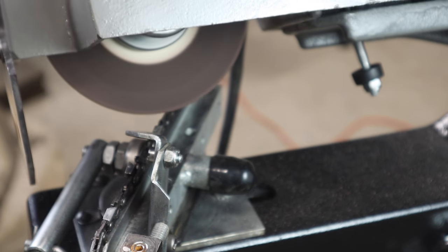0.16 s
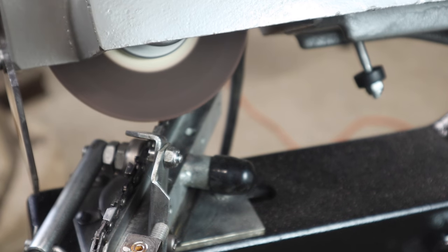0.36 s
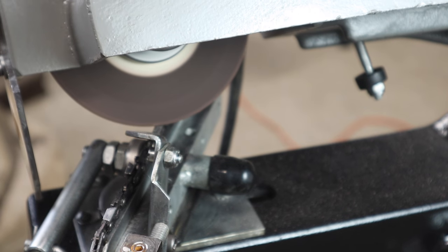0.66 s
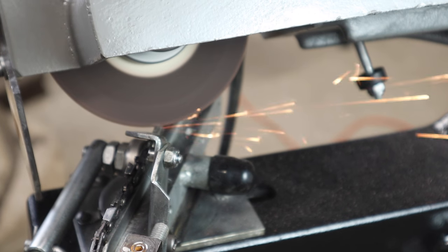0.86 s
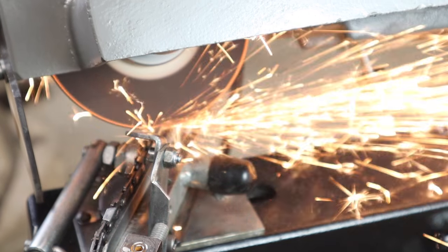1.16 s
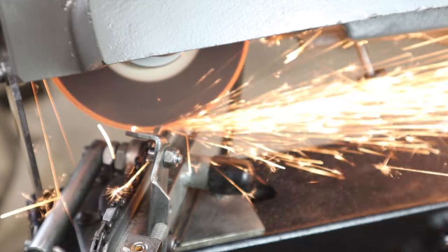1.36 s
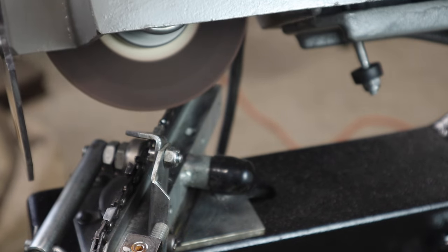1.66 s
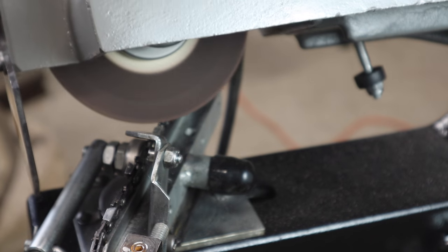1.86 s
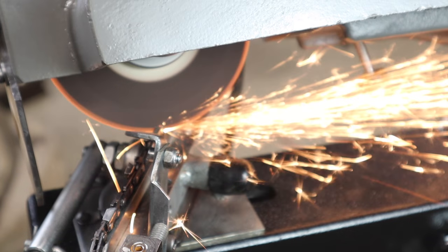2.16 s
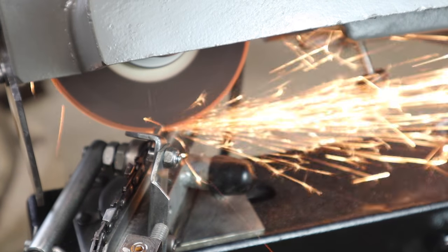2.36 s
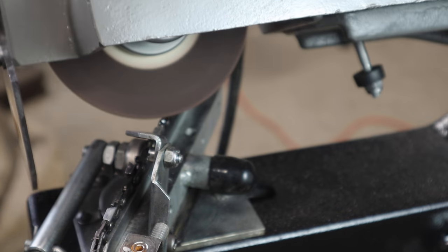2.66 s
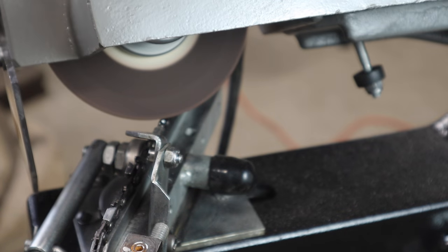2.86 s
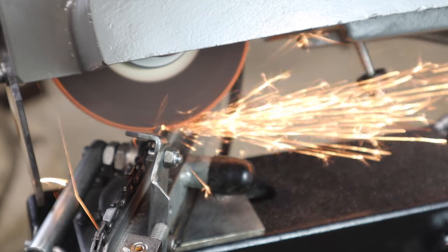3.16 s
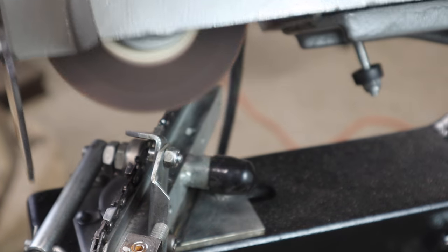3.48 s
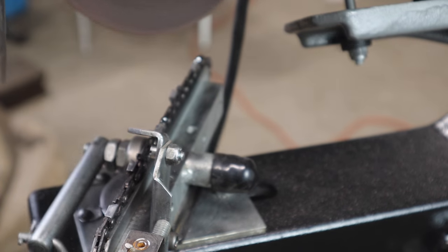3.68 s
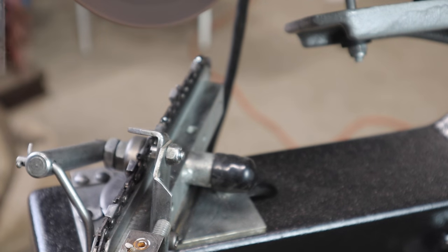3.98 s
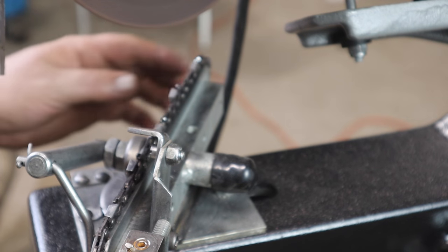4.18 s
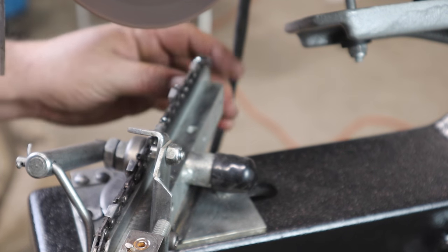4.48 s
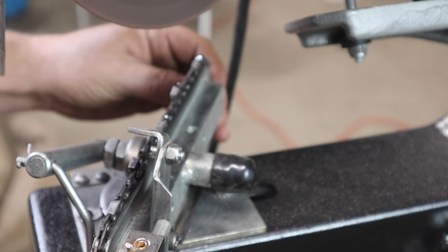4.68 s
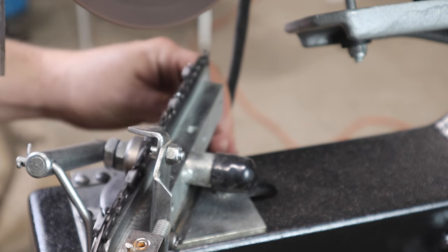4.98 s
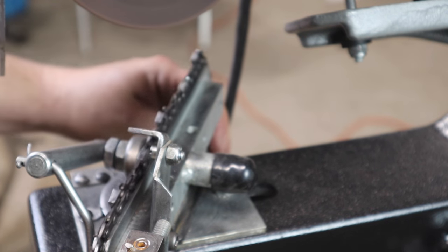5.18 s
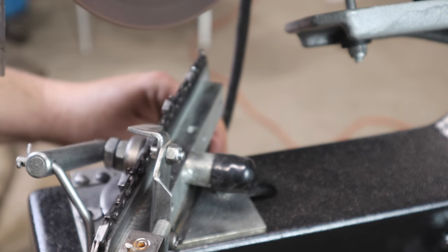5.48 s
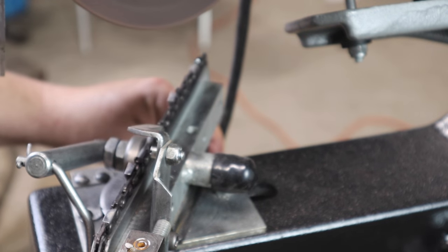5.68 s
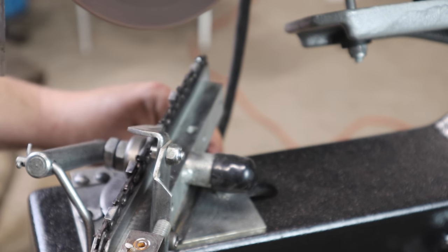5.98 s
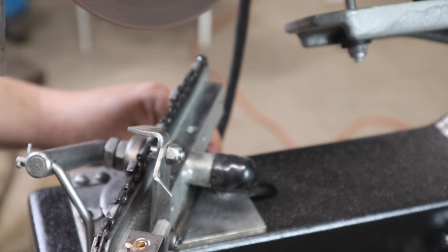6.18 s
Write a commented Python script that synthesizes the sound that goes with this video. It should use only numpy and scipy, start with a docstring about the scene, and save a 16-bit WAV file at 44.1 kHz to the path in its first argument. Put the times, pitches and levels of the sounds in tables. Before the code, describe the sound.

A belt-driven chain grinder is already running, close to a small microphone in a workshop, and never stops. Its motor is a dense, nasal metallic whine around 1.3 kilohertz over a weak low hum, roughened by housing rattle and uneven throbbing of roughly twenty-odd pulses a second, with a soft rush of air. From about 0.7 s the wheel touches a saw tooth lightly, grows firmer near 1.1 s, peaks harshly at 1.3 s and ends by 1.5 s. A second gritty rasp bites abruptly at 2.2 s and fades by 2.6 s; a third, softer one runs from 3.1 to 3.5 s. Each is bright, crackling and ringing, with the motor pitch sagging slightly and short wall reflections. From 3.4 to 3.7 s the head swings up, subtly recolouring and slightly strengthening the whine. Tiny, high link ticks come at 3.9, faintest, then 5.2, 5.55 and 6.0 s, with the motor continuing to the end, about 6.3 s.

```python
"""A belt-driven chain grinder runs in a workshop: its shaft knocks once a turn and rings the cast housing, as
tones plus uneven blows and rattle that throb with the belt, in a smooth rush of air made from coloured noise.
Three times the wheel is lowered onto a saw tooth: random grit clicks ring tooth and vice, and the motor sags.
As the third pass ends the head is swung up, which changes how the housing sounds.
Then a hand moves the chain along and its links tick, each a crack and one fading ring."""
import sys
import numpy as np
from scipy import signal
from scipy.io import wavfile
from scipy.ndimage import uniform_filter1d

SR = 44100
rng = np.random.default_rng(int(sys.argv[2]) if len(sys.argv) > 2 else 0)


def natural_amplitude(level_db):
    """Convert a level in decibels to a linear amplitude factor, elementwise."""
    exponent = np.asarray(level_db, float) / 20
    return 10 ** exponent


def wrap_up_sound(samples):
    """Save the sound to the file named by the first command line argument, as 16-bit audio."""
    columns = np.atleast_2d(samples).T
    # keep every value between -1 and 1, then stretch to whole-number steps
    tamed = np.clip(columns, -1, 1)
    steps = np.round(tamed * 32767).astype(np.int16)
    wavfile.write(sys.argv[1], SR, steps)


N = 279594  # length in samples

FREE_HZ = 133.4  # shaft speed with no load, before it creeps up


def motor(t, turns, load):
    """Shaft blows: their steady part is a stack of tones, their uneven part and a rattle ring the housing."""
    # Head being swung up. Each row: time in seconds, how far it is raised (0-1).
    swing_up = [(3.35, 0.02), (3.7, 0.74)]
    # Resonances of the cast housing. Each row: frequency in Hz, width in Hz, peak in dB with the head down,
    # peak in dB with the head up.
    housing = [(384, 114, -34.5, -27.5), (580.5, 49.7, -8, -8.5), (638, 46, -8.5, -11.5),
               (917, 97, -15.5, -10.5), (1039, 340, -13.5, -13.5), (1206, 210, -9, -9),
               (1307.6, 53, 0.5, -4), (1429, 68.6, 1.5, 1.5), (1595, 45, -22, -38), (1718, 120, -15, -13.5),
               (1967, 74, -10, -12), (2102, 95, -17, -11), (2379, 175, -14.5, -15), (3006, 110, -15.5, -17),
               (3314, 57, -52, -16), (4072, 136, -15.5, -18), (4504, 280, -21.5, -19.5),
               (4700, 220, -26, -23), (5364, 73, -25, -24), (6160, 77, -30, -32), (7030, 86, -56, -32.5),
               (7610, 170, -34.5, -36), (8330, 1500, -37, -39.5), (9330, 420, -34.5, -40.5),
               (10500, 160, -44, -53), (11450, 230, -41, -40), (12900, 370, -49, -60)]
    # Response of the housing between its resonances. Each row: frequency in Hz, level in dB.
    between = [(20, -80), (60, -69), (250, -55), (480, -52.5), (1000, -78), (2500, -25), (5000, -28.5),
               (7000, -43), (12000, -43.5), (15500, -63)]
    # Clean tones on multiples of the shaft speed: running free with the head down, free with the head up,
    # and with the wheel cutting. Each row: multiple of the shaft speed, relative level in dB.
    tones_down = [(1, -39), (2, -29), (3, -21.5), (4, -12.5), (5, -6.5), (6, -24), (7, -9), (8, -10),
                  (9, -45), (10, 4), (11, -2), (12, -11.5), (13, -18.5), (14, -18.5), (15, -28),
                  (16, -17.5), (17, -15.5), (18, -15.5)]
    tones_up = [(1, -33), (2, -31.5), (3, -21.5), (4, -10), (5, -12.5), (6, -17), (7, -1), (8, -7.5),
                (9, -6), (10, 4.5), (11, -1.5), (12, -19), (13, -13), (14, -22), (15, -42), (16, -12.5),
                (17, -17.5), (18, -24)]
    tones_loaded = [(1, -33.5), (2, -24.5), (3, -20.5), (4, -15), (5, -4.5), (6, -55), (7, -6.5), (8, -5),
                    (9, -6.5), (10, 4.5), (11, 3), (12, -8), (13, -18.5), (14, -27), (15, -14), (16, -16.5),
                    (17, -18.5), (18, -39)]
    tones_db, blows_db, rattle_db = -1, -9.5, -2.5  # balance of the three layers

    up = np.interp(t, *np.transpose(swing_up))
    swing = belt_swing(t, turns, load)
    blow = turns + 0.2994  # a blow falls at each whole number
    whole = np.arange(int(blow[-1]) + 1)

    # the play in the bearing limits a blow, so the throb shows as weak blows between full ones
    scatter = 0.29 * np.tanh(rng.standard_normal(len(whole)))
    strength = 1 + np.tanh(np.interp(whole, blow, swing) + scatter)

    # a blow is a short push, which dulls its treble
    contact_s = .00008
    clicks = pulses(blow, strength - strength.mean())
    uneven = signal.lfilter([1], [1, -np.exp(-1 / (contact_s * SR))], clicks)

    # loose parts rattle all the time, more just after each blow and harder after a strong one
    rattle_level = strength[blow.astype(int)] ** 0.42 * (1.0 + np.exp(-(blow % 1) / .5))
    rattle = rng.standard_normal(N) * rattle_level

    out = np.zeros(N)
    for share, column, tones in ((1 - up, 2, tones_down), (up, 3, tones_up)):
        ring = colour([(m[0], m[1], m[column]) for m in housing], between)
        # the housing sets the phase of each tone
        phase = np.angle(signal.freqz(ring, worN=np.transpose(tones)[0] * FREE_HZ, fs=SR)[1])
        steady = np.zeros(N)
        for (multiple, free_db), (_, loaded_db), p in zip(tones, tones_loaded, phase):
            tone_level = natural_amplitude(free_db) * (1 - load) + natural_amplitude(loaded_db) * load
            steady += tone_level * np.cos(2 * np.pi * multiple * blow + p)
        steady = natural_amplitude(tones_db) * evened(steady) * np.exp(0.11 * swing)
        rung = natural_amplitude(blows_db) * evened(signal.oaconvolve(uneven, ring)[:N])
        rung += natural_amplitude(rattle_db) * evened(signal.oaconvolve(rattle, ring)[:N])
        # uneven blows and rattle come up slightly under load
        out += share * (steady + natural_amplitude(0.5 * load) * rung)
    return housing_level(t, load, up) * out


def housing_level(t, load, up):
    """Gain of the whole motor sound, shifted by load and a raised head; the level dips briefly."""
    # Brief dips. Each row: centre in seconds, depth in dB, half length in seconds.
    dips = [(0.0, -1, 0.1), (0.68, -1, 0.13), (1.627, -1, 0.19), (2.58, -1.3, 0.15), (3.583, -1.5, 0.25),
            (4.333, -1.25, 0.13), (5.9, -.8, .2)]
    idle_db, loaded_db, raised_db = -16, -0.03, 1.27  # idle level, then the changes at full load and fully up
    level_db = idle_db + loaded_db * load + raised_db * up
    for centre_s, depth_db, half_s in dips:
        level_db += depth_db * np.exp(-((t - centre_s) / half_s) ** 2)
    return natural_amplitude(level_db)


def belt_swing(t, turns, load):
    """Slow throbs in the blows: the belt going round, and a faster flutter that cutting damps."""
    # Flutter before damping. Each row: time in seconds, depth of the swing.
    flutter_depth = [(0.0, 0.32), (.85, 0.58), (1.7, 0.21), (2.1, 0.36), (2.7, 0.05), (3.6, 0.25),
                     (6.34, 0.05)]
    belt, flutter = 1 / 6, .1966  # cycles per shaft turn
    depth = np.interp(t, *np.transpose(flutter_depth)) * (1 - 0.39 * load)
    return 0.28 * throb(belt * turns, 0.52, 0.39) + depth * throb(flutter * turns, -0.12, 0.14)


def throb(turns, start, skew, sharp=0.12):
    """A swing that rises faster than it falls, with a jerk at its top; start is in turns of the throb."""
    angle = 2 * np.pi * (turns + start)
    jerk = sharp * np.cos(2 * angle) + sharp / 2 * np.cos(3 * angle)
    return np.cos(angle) - skew * np.sin(2 * angle) + jerk


def pulses(turns, sizes):
    """One click at each whole turn, shared between the two nearest samples."""
    whole = np.arange(1, int(turns[-1]))
    at = np.interp(whole, turns, np.arange(N))
    out = np.zeros(N + 1)
    np.add.at(out, at.astype(int), sizes[whole] * (1 - at % 1))
    np.add.at(out, at.astype(int) + 1, sizes[whole] * (at % 1))
    return out[:N]


def shaft(t, press):
    """Turns and load (0-1) of the shaft: it sags with pressure squared, a little late, and creeps up in speed."""
    sag_hz, lag_s, full_sag_hz = 4.2, 0.052, 2.3  # sag at pressure 1, its lag, sag that counts as full load
    creep_hz_per_s = .016
    keep = np.exp(-1 / (lag_s * SR))
    sag = sag_hz * signal.lfilter([1 - keep], [1, -keep], press ** 2)
    turns = np.cumsum(FREE_HZ + creep_hz_per_s * t - sag) / SR
    return turns, np.clip(sag / full_sag_hz, 0, 1)


def rasp(press, turns):
    """Grit strikes the tooth in dense clicks; the wheel runs out of true, so it bites harder once a turn."""
    # Smooth spectrum of the grit. Each row: frequency in Hz, level in dB.
    grit_spectrum = [(300, -29.5), (800, -4.5), (2000, -7), (4000, -6.5), (5000, -14.5), (7000, -14.5),
                     (12000, -20), (15500, -36)]
    # Tooth and vice ringing under the wheel. Each row: frequency in Hz, width in Hz, peak in dB.
    tooth_modes = [(2400, 70, -8), (2990, 80, -6), (3300, 120, -8), (4080, 110, 1), (4435, 130, 2),
                   (4860, 90, -6), (5290, 110, -3), (5950, 150, -9), (6450, 100, -10), (6800, 100, -8),
                   (8800, 140, -10), (10500, 240, -13)]
    grains_per_s, wheel_per_turn = 5000, .485  # mean rate of grains; wheel turns per shaft turn
    skim = 0.1  # below about this pressure the wheel only catches now and then
    firm_db = -24  # level before the pressure scales it

    grit = natural_amplitude(2.0 * np.minimum(rng.exponential(1, N), 5)) * rng.choice([-1., 1.], N)
    grit *= rng.random(N) < grains_per_s / SR
    grit *= 1 + 0.31 * np.cos(2 * np.pi * wheel_per_turn * turns)
    grit *= 1 + 0.24 * np.cos(2 * np.pi * turns)  # the shaft's knock shakes the wheel
    catch = evened(uniform_filter1d(uniform_filter1d(rng.standard_normal(N), 500), 300))
    grit *= np.clip(.5 + press / skim + 1.24 * catch, 0, 1.5) / 1.5
    rung = evened(signal.oaconvolve(grit, colour(tooth_modes, grit_spectrum))[:N])
    return natural_amplitude(firm_db) * press * rung


def pressure(t):
    """How hard the wheel bears on the tooth, with softened edges to each pass; 1 is a firm cut."""
    # One list for each pass of the wheel. Each row: time in seconds, pressure in dB (0 = a firm cut).
    passes = [
        [(0.73, -13), (0.756, -9), (0.86, -14), (1.082, -2.5), (1.262, -3), (1.295, 4), (1.5, -8.5),
         (1.53, -21)],
        [(2.17, -16), (2.202, 0.16), (2.284, -4.5), (2.38, -3), (2.5, -8), (2.57, -16.5)],
        [(3.09, -20), (3.138, -4.5), (3.42, -7), (3.47, -23.5)],
    ]
    press = np.zeros(N)
    for rows in passes:
        s, db = np.transpose(rows)
        on = (t >= s[0]) & (t < s[-1])
        press[on] = natural_amplitude(np.interp(t[on], s, db)) * signal.windows.tukey(on.sum(), .08)
    return press


def ticks():
    """Chain links tick under the hand: a noisy crack and one ring, dying away together."""
    # Each row: start in seconds, level in dB, ring frequency in Hz.
    links = [(3.9095, -38.5, 8500), (5.162, -32, 11300), (5.5503, -32, 8470), (6.0072, -29, 8350)]
    t60_s = .02
    out, t = np.zeros(N + 2000), np.arange(2000) / SR
    for start_s, db, hz in links:
        tick = np.sin(2 * np.pi * hz * t) + .2 * rng.standard_normal(2000)
        out[round(start_s * SR):][:2000] += natural_amplitude(db - 60 * t / t60_s) * tick
    return out[:N]


def workshop(x):
    """Sparse wall reflections of random sign, dying away."""
    t60_s = 0.13
    at = np.arange(200, SR // 2, 20)
    tail = np.zeros(SR // 2 + 20)
    signs = rng.choice([-1., 1.], len(at))
    tail[at + rng.integers(0, 20, len(at))] = signs * natural_amplitude(-60 * at / SR / t60_s)
    return signal.oaconvolve(x, tail / np.linalg.norm(tail))[:N]


def air():
    """Smooth rush of air round the motor and wheel: noise through a fixed spectrum."""
    # Each row: frequency in Hz, level in dB.
    rush = [(20, -15), (60, -9), (125, -1.5), (250, 1.5), (480, 2.5), (1500, -14.5), (6000, -27),
            (15500, -36)]
    return natural_amplitude(-43.5) * evened(signal.oaconvolve(rng.standard_normal(N), colour([], rush))[:N])


def colour(modes, base, size=8192):
    """Causal (minimum-phase) response with steep resonant peaks standing on a smooth spectrum."""
    hz = np.fft.rfftfreq(size, 1 / SR)
    f, db = np.transpose(base)
    power = natural_amplitude(np.interp(np.log(hz + 1), np.log(f), db)) ** 2
    for centre_hz, width_hz, peak_db in modes:
        power = power + natural_amplitude(peak_db) ** 2 / (1 + (2 * (hz - centre_hz) / width_hz) ** 2) ** 2
    log_gain = np.log(np.r_[power, power[-2:0:-1]]) / 2
    return np.fft.ifft(np.exp(np.conj(signal.hilbert(log_gain)))).real[:size // 2]


def evened(x):
    """Scales to rms 1."""
    return x / np.sqrt(np.mean(x ** 2) + 1e-20)


def scene():
    """Motor, air and chain close by; the rasp also comes back from the walls."""
    t = np.arange(N) / SR
    press = pressure(t)
    turns, load = shaft(t, press)
    grind = rasp(press, turns)
    walls = natural_amplitude(-7) * workshop(grind)
    return (motor(t, turns, load) + grind + walls + ticks() + air())[None]


def top_cut(x):
    """Nothing passes above the cut-off."""
    return signal.sosfilt(signal.butter(12, 15690, fs=SR, output="sos"), x)


def record(dry):
    """A small microphone that rounds the peaks."""
    mix = np.tanh(dry / 1.51) * 1.386
    return top_cut(mix)


dry = scene()
out = record(dry)
wrap_up_sound(out)
```